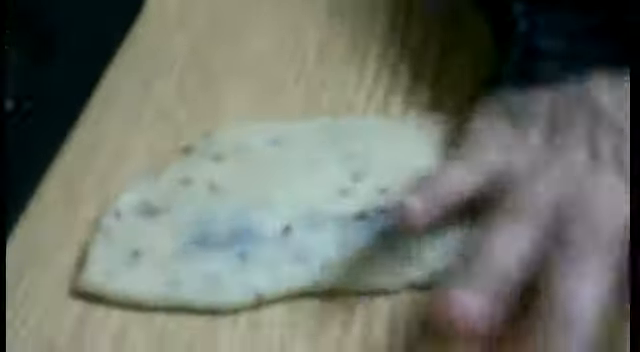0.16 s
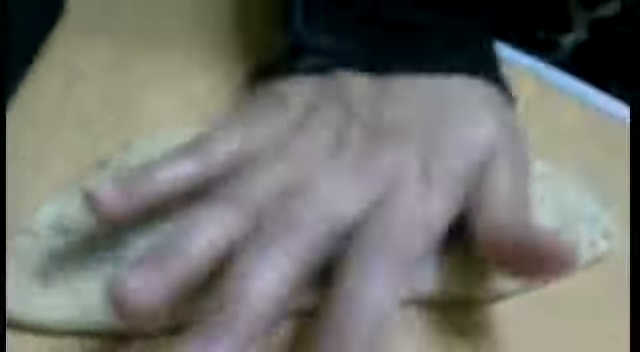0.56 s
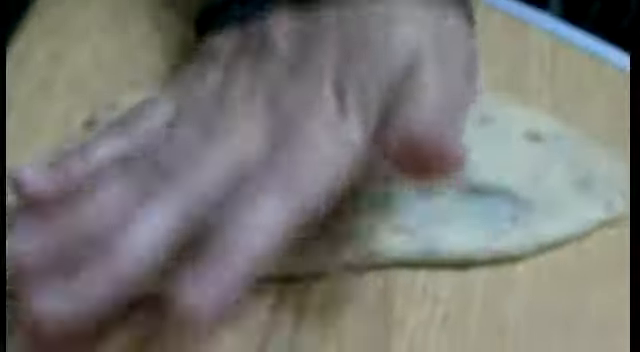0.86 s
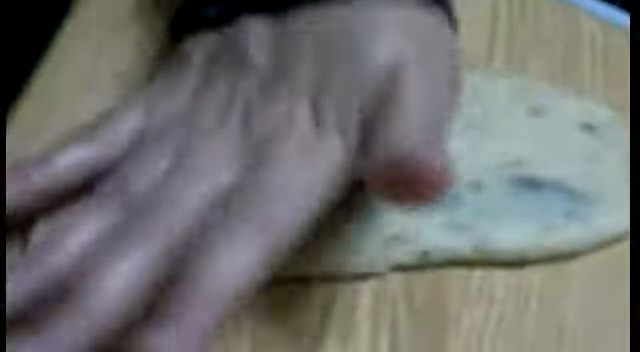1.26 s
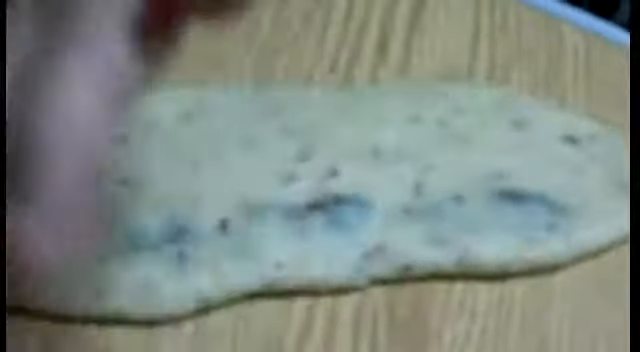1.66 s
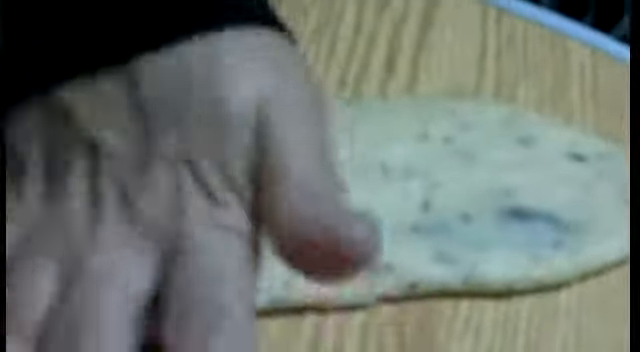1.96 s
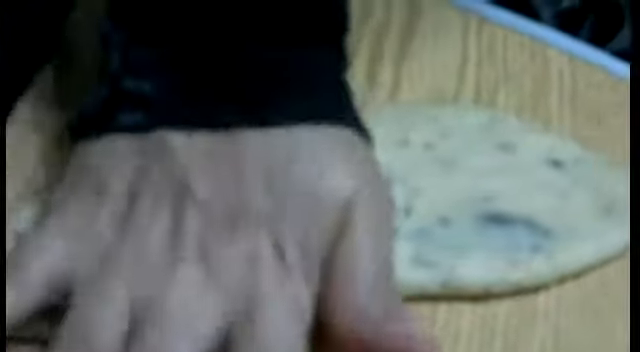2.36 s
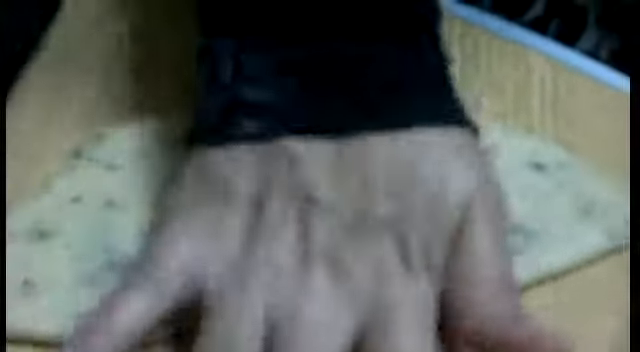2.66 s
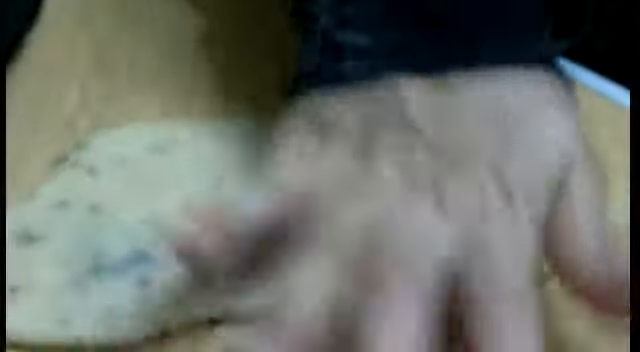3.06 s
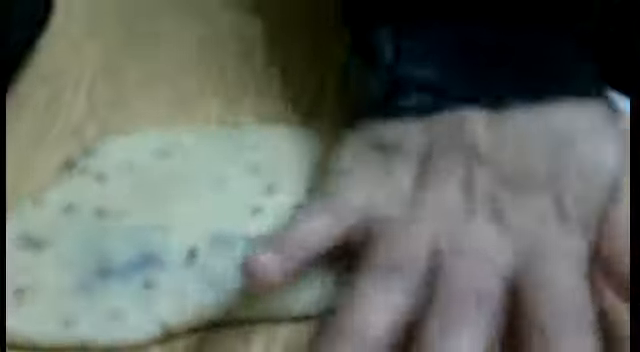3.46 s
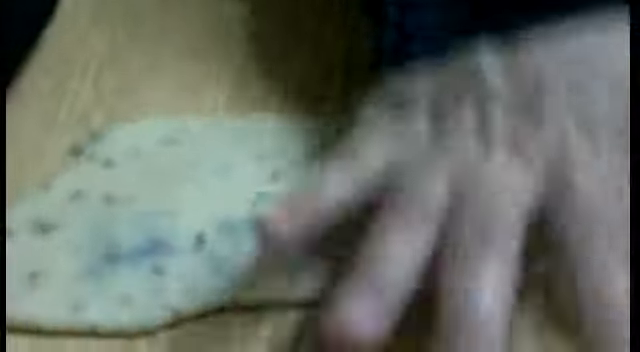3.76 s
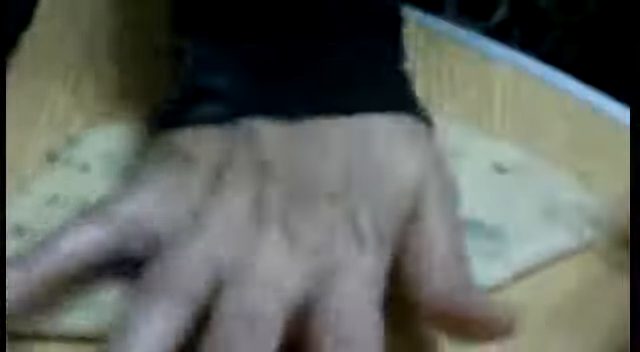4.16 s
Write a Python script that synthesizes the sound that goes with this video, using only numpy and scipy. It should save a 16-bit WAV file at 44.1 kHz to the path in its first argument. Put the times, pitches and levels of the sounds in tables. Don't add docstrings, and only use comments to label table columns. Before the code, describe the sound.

A hand slaps and presses dough on a wooden board. Hard clustered pats come in the first second, gentler dull thumps follow until about two and a half seconds, then a hard flurry and steady firm pats. Skin peels away with short sticky crackles, and loose cutlery briefly chatters after the hardest hits. The kitchen is quiet; the phone lies on the same worktop, so sound is close, woody and mostly on the right.

```python
import sys
import numpy as np
from scipy import signal
from scipy.fft import rfft, irfft
from scipy.io import wavfile
from scipy.ndimage import uniform_filter1d

SR = 44100
rng = np.random.default_rng(int(sys.argv[2]) if len(sys.argv) > 2 else 0)


def unload_wav(signal):
    wavfile.write(
        sys.argv[1],
        SR,
        np.round(np.clip(np.atleast_2d(signal).T, -1, 1) * 32767).astype(np.int16),
    )


def linear_from_db(decibels):
    return 10 ** (np.asarray(decibels, float) / 20)


N = 189559


def read(table, hz):
    f, v = np.transpose(table)
    return np.interp(np.log(np.maximum(hz, 1)), np.log(np.maximum(f, 1)), v)


def colour(x, table):
    return irfft(rfft(x) * linear_from_db(read(table, np.fft.rfftfreq(N, 1 / SR))), N)


def unit(x):
    return x / np.sqrt(np.mean(x ** 2))


def ring(x, hz, t60):
    pole = np.exp(2j * np.pi * hz / SR - np.log(1000) / (t60 * SR))
    return signal.lfilter([1], [1, -pole], x).imag


def band(x, hz, width):
    b, a = signal.iirpeak(hz, hz / width, SR)
    return signal.lfilter(b, a, signal.lfilter(b, a, x))


def crackle(per_s, spread_db):
    hit = rng.random(N) < per_s / SR
    size = linear_from_db(spread_db * rng.exponential(size=N))
    return unit(hit * rng.standard_normal(N) * size)


def wander(rate):
    k = int(SR / rate)
    smooth = uniform_filter1d(rng.standard_normal(N), k)
    return unit(uniform_filter1d(smooth, k))


def effort(events, rise_db_s, fall_db_s):
    t = np.arange(N) / SR
    levels = []
    for s, hold, db in events:
        before = np.maximum(s - t, 0)
        after = np.maximum(t - s - hold, 0)
        levels.append(db - rise_db_s * before - fall_db_s * after)
    return np.max(levels, axis=0)


def kitchen():
    # frequency in Hz, level in dB per Hz.
    air_spectrum = [(15, -42.5), (25, 1.5), (55, 14.5), (103, -6), (206, -6.5), (450, -11), (700, -8.5),
                    (1200, -16), (2000, -20.5), (4000, -25), (8000, -27.5), (12000, -33.5), (15300, -37.5),
                    (16000, -55.5)]
    air = np.array([unit(colour(rng.standard_normal(N), air_spectrum)) for _ in range(2)])
    port_db = np.array([[-1.5], [5.5]])
    return linear_from_db(-63.5 + port_db) * air


def cutlery():
    # frequency in Hz, width in Hz, level in dB.
    pieces = [(6550, 60, 0.5), (7360, 60, 4.5), (7250, 140, 8.5), (7760, 80, 3), (8300, 60, -7),
              (8730, 32, -6.5), (10150, 46, 4), (10450, 29, 0.5), (10600, 60, 1.5), (11500, 50, 0.5),
              (12000, 89, 5.5), (12400, 60, -1.5), (12900, 45, -2), (13300, 70, -11.5), (14300, 70, -13),
              (14750, 70, -10.5)]
    # start in seconds, hold in seconds, level in dB,
    # frequency in Hz of the piece that shakes most.
    shivers = [(0.199, 0.0046, -66.5, 7240), (0.313, 0.017, -62, 9300), (0.437, 0.0036, -68, 7500),
               (0.455, 0.019, -56.5, 10150), (0.478, .015, -58.5, 14500), (.53, .03, -56, 7250),
               (.535, .015, -62, 8730), (0.536, .025, -56, 10500), (2.596, 0.028, -76, 7250),
               (2.607, .03, -62, 10500), (0.493, .004, -62, 12100), (0.523, .01, -57, 11500),
               (0.533, 0.016, -47.5, 11750), (0.715, 0.0069, -63.5, 7460), (0.788, 0.033, -71, 9600),
               (1.822, .008, -66, 8300), (2.339, 0.008, -61, 7650), (2.575, .004, -66, 9000),
               (2.606, .006, -62, 9000), (2.608, .009, -56.5, 12000), (2.634, 0.0065, -54, 12100),
               (2.822, 0.0046, -72, 7500), (2.862, .003, -58, 8000), (2.866, 0.01, -61, 8700),
               (3.401, 0.014, -67.5, 7700), (3.888, .003, -69, 7200)]
    chatter = crackle(6000, 2)
    out = np.zeros(N)
    for hz, width, db in pieces:
        shakes = []
        for s, hold, top_db, most_hz in shivers:
            shakes.append((s, hold, top_db - 31 * abs(np.log2(hz / most_hz))))
        level_db = effort(shakes, rise_db_s=1198.5, fall_db_s=700.5)
        lie_still_db = np.minimum(level_db + 81, 0)
        gain = linear_from_db(level_db + db - 9.5 + 2.0 * wander(30) + lie_still_db)
        out += gain * unit(band(chatter, hz, width))
    return out


def rub():
    # frequency in Hz, level in dB per Hz.
    slip_spectrum = [(18, -32.5), (30, -18.5), (103, -8.5), (146, -15), (193, 12.5), (298, 0), (469, 2),
                     (2040, -5.5), (4000, -22.5), (5300, -41.5), (6890, -57.5), (11700, -120)]
    # start in seconds, hold in seconds, level in dB.
    squeezes = [(0, 0.022, -27.5), (.2, 0.046, -37), (.37, 0.013, -41), (.46, 0.016, -41.5),
                (.61, 0.0088, -40.5), (.74, 0.17, -46), (1.18, 0.06, -42), (1.31, .06, -55.5),
                (1.5, .02, -58), (1.83, 0.012, -57), (2.07, 0.0085, -39), (2.27, 0.024, -59),
                (2.5, 0.063, -47.5), (2.72, 0.06, -40.5), (2.93, 0.029, -39.5), (3.2, 0.0026, -39),
                (3.42, 0.025, -41.5), (3.66, 0.0078, -34.5), (4, 0.027, -47)]
    level_db = effort(squeezes, rise_db_s=147, fall_db_s=182)
    return linear_from_db(level_db - 2.5) * unit(colour(crackle(7000, 0.8), slip_spectrum))


def peel():
    # frequency in Hz, width in Hz, level in dB.
    hiss_bands = [(3400, 907, 19.5), (4100, 150, 14), (4570, 530, 7.5), (6070, 590, -18.5),
                  (10500, 12000, -49.5)]
    # start in seconds, hold in seconds, level in dB.
    releases = [(0, 0.06, -35.5), (.23, 0.0075, -29), (.26, 0.068, -36.5), (.47, 0.0014, -27),
                (.53, 0.048, -33.5), (.74, 0.07, -36.5), (.98, 0.026, -43), (1.2, 0.015, -62),
                (1.84, 0.0093, -38), (2.08, 0.0095, -41.5), (2.36, 0.0033, -38), (2.55, 0.14, -36),
                (2.82, 0.065, -37), (3.06, 0.028, -40.5), (3.14, 0.013, -42), (3.32, 0.085, -40.5),
                (3.55, 0.029, -40.5), (3.63, 0.012, -44), (3.83, 0.0069, -39.5), (3.9, 0.034, -38.5),
                (4.09, 0.017, -43.5), (4.16, 0.04, -43)]
    level_db = effort(releases, rise_db_s=908, fall_db_s=313)
    slips = crackle(9000, 1.8)
    hiss = sum(linear_from_db(db) * unit(band(slips, hz, width)) for hz, width, db in hiss_bands)
    return linear_from_db(level_db - 4.0) * unit(hiss)


def cracks():
    # start in seconds, level in dB, pitch in Hz.
    tears = [(0.0144, -48, 4200), (0.0343, -52, 4130), (0.2034, -53, 4900), (0.213, -40, 4540),
             (0.2259, -49, 4300), (0.2818, -32, 4150), (0.4334, -47, 4650), (0.4377, -36, 4240),
             (0.4542, -28, 4230), (0.4683, -23, 4270), (0.4683, -39, 4460), (0.515, -24, 4330),
             (0.7, -42, 4240), (0.7225, -35, 4220), (0.7426, -31, 4100), (1.823, -39.5, 4400),
             (1.847, -53, 4200), (2.0747, -59, 4330), (2.3356, -52.5, 4360), (2.5187, -34.5, 4220),
             (2.5321, -34, 4200), (2.5497, -33, 4200), (2.5726, -41, 4280), (2.583, -30, 4170),
             (2.6, -31.5, 4570), (2.6324, -29.5, 4300), (2.6798, -54, 4450), (2.7661, -51, 5300),
             (2.7826, -44, 4260), (2.8002, -31, 4040), (2.835, -50, 4240), (2.855, -39, 4540),
             (3.0397, -38.5, 4700), (3.054, -49, 4290), (3.0734, -58, 4340), (3.1193, -58, 4750),
             (3.1423, -45, 4170), (3.2931, -38, 4770), (3.3094, -44, 4440), (3.359, -50, 4200),
             (3.369, -52, 4140), (3.5498, -56, 4610), (3.6112, -59, 4720), (3.6316, -38, 4220),
             (3.8062, -38, 4510), (3.8237, -58, 4230), (3.8871, -55, 4600), (3.8891, -54, 4260),
             (4.0632, -63, 4410), (4.156, -46, 4420)]
    # start in seconds, level in dB, pitch in Hz.
    air_ticks = [(0.016, -65, 8500), (0.206, -51, 9000), (.706, -58, 9040), (.953, -70.5, 8000),
                 (1.831, -53, 8500), (2.241, -55, 10000), (2.5187, -49.5, 9500), (2.533, -68, 12500),
                 (2.689, -55, 10000), (2.854, -53, 8500), (3.041, -59.5, 9500), (3.057, -68, 13000),
                 (3.121, -71, 12500), (3.2928, -55, 9000), (3.372, -59, 12400), (3.5345, -52.5, 9200),
                 (3.806, -54.5, 9900), (3.889, -68, 9100)]
    rows = [*tears, *air_ticks]
    out = np.zeros(N)
    t = np.arange(600) / SR
    for s, db, hz in rows:
        burst = unit(band(rng.standard_normal(len(t)), hz, hz * 0.37))
        out[int(s * SR):][:len(t)] += linear_from_db(db - 6.5) * burst * np.exp(-t / 0.0037)
    return out


def taps():
    # start in seconds, level in dB, pitch in Hz.
    drops = [
        (.4685, -11, 2200),
        (2.5495, -6, 2000),
        (3.3285, -17, 1750),
        (3.5665, -16, 1750),
    ]
    out = np.zeros(N)
    t = np.arange(300) / SR
    for s, db, hz in drops:
        tick = np.sin(2 * np.pi * hz * t) * np.exp(-t / 0.0007)
        out[int(s * SR):][:len(t)] += linear_from_db(db + 5) * tick
    return out


def contacts():
    # start in seconds, snap in dB, thud in dB, knock in dB.
    heels = [(0.033, -40.5, -25.5, -25.5), (0.216, -8.5, -16, -17), (0.2822, -11, -19, -17),
             (0.467, -13, -18.5, -48.5), (0.7017, -11, -25.5, -20), (0.77, -19, -19, -27),
             (1.007, -26.5, -26, -27), (1.211, -27, -22, -28), (1.426, -25, -24.5, -32.5),
             (1.749, -32, -26.5, -31.5), (1.8221, -29.5, -29, -46), (1.8501, -25.5, -33, -27),
             (2.0716, -20, -25.5, -27), (2.087, -32.5, -34, -42), (2.7838, -11.5, -33.5, -19),
             (2.8489, -13, -20, -17.5), (3.0566, -10, -16.5, -20), (3.1207, -12.5, -20, -16.5),
             (3.3109, -11, -15.5, -23.5), (3.551, -13, -23.5, -19), (3.612, -12, -18, -15.5),
             (3.8244, -20.5, -19.5, -24), (3.8883, -10.5, -18.5, -18), (4.063, -30, -27, -23),
             (4.0785, -20.5, -23.5, -31.5), (4.18, -25, -27.5, -28.5), (0.4548, -9.5, -37, -15.5),
             (0.5145, -9.5, -18, -21.5), (2.5342, -6.5, -14.5, -20.5), (3.3725, -12, -38, -19.5)]
    # start in seconds, snap, thud and knock in dB, snap pitch in Hz.
    slaps = [(0.0154, -8.5, -19.5, -23, 2960), (0.7425, -8, -23.5, -27, 3000),
             (0.97, -25, -27.5, -34.5, 2120), (2.252, -28, -44.5, -33, 2370),
             (2.3374, -21.5, -22.5, -22.5, 1690), (2.584, -12.5, -19.5, -31.5, 2820),
             (2.5953, -13, -33.5, -25.5, 1340), (2.6015, -10.5, -37, -31, 3300),
             (2.6485, -26.5, -39, -37.5, 1470), (3.8625, -28, -44, -38, 1500), (.4385, -23, -41, -28, 1900),
             (.557, -25, -39.5, -40.5, 2030), (3.359, -20.5, -22, -51, 2240), (.184, -44, -47, -33.5, 2660),
             (1.1785, -22.5, -45, -38, 2590), (2.089, -30, -45, -45.5, 3300),
             (1.44, -34, -26.5, -28.5, 700), (0.7451, -13.5, -40.5, -41, 3200),
             (.2395, -14, -41, -44, 3300), (.7055, -17, -29.5, -23, 800), (4.0695, -31, -31, -28, 562),
             (.2225, -8.5, -33, -48, 2150), (.4718, -16, -34.5, -33.5, 2689),
             (0.503, -23.5, -41, -29, 2400), (0.805, -40.5, -33.5, -36, 3300), (2.536, -15, -26, -13, 1440),
             (2.5985, -13, -34.5, -27, 3320), (2.634, -21.5, -48, -46.5, 3930),
             (2.854, -14.5, -36, -33, 3240), (3.8288, -17.5, -29, -27, 815), (3.902, -29, -31, -45, 2400),
             (4.2978, -34.5, -30, -37.5, 1500)]
    # start in seconds, snap in dB, thud in dB.
    tips = [(.078, -20, -43.5), (0.0955, -21.5, -50), (0.2018, -24.5, -45), (0.2055, -15.5, -41),
            (0.2383, -11, -20), (.7219, -6, -24), (0.953, -19, -43), (1.018, -24, -44), (1.165, -16.5, -42),
            (1.7813, -20, -29.5), (1.7915, -26, -32.5), (1.8535, -22, -35), (2.023, -19, -28),
            (2.265, -30, -27.5), (2.3486, -17.5, -40), (2.3515, -18.5, -40), (2.5192, -12.5, -41.5),
            (2.545, -23.5, -32.5), (2.681, -12.5, -28), (2.801, -6.5, -21), (2.836, -15, -24),
            (3.0736, -7.5, -43.5), (3.2922, -21, -31), (3.564, -40, -22.5), (3.8443, -8, -32.5),
            (3.8774, -21.5, -26.5), (4.143, -32, -40)]
    # start in seconds, snap in dB, thud in dB.
    touches = [(0.15, -32, -51), (.438, -30, -26), (0.5, -30, -40.5), (0.678, -39.5, -37),
               (0.932, -39.5, -40), (0.992, -29, -41.5), (1.1169, -44, -32.5), (1.114, -32, -30.5),
               (1.231, -36.5, -30), (1.195, -38.5, -46), (1.377, -41, -35), (1.404, -34.5, -26),
               (1.7335, -45.5, -43), (1.746, -40.5, -40.5), (1.831, -33, -39), (0.7, -36, -45.5),
               (0.72, -28, -27.5), (.448, -25, -38), (2.49, -33, -47.5), (3.3045, -23, -32.5),
               (1.9785, -42, -42), (1.9897, -38.5, -40.5), (2.2387, -36.5, -61.5), (2.2836, -28, -55),
               (2.318, -42, -44.5), (2.324, -29, -45.5), (3.821, -26, -32), (2.7674, -27.5, -28),
               (3.04, -25.5, -21), (3.34, -26.5, -45), (3.5345, -29, -28), (3.528, -42, -45),
               (3.297, -30, -40), (1.398, -34, -30), (2.3, -42.5, -50), (3.807, -32.5, -43.5),
               (4.055, -42, -39), (4.16, -30, -50.5), (4.288, -51.5, -38)]
    # start in seconds, knock in dB, snap in dB.
    settles = [(0.308, -47.5, -38.5), (0.803, -29.5, -26.5), (1.301, -37, -76), (1.341, -36, -58),
               (1.441, -33, -59), (1.497, -38.5, -53), (2.143, -58, -47), (2.451, -51.5, -44.5),
               (2.648, -36, -24), (2.705, -37, -35), (2.894, -27.5, -28.5), (2.955, -69, -42),
               (3.013, -39, -59), (3.15, -45, -27), (3.446, -57.5, -31.5), (3.655, -52.5, -34),
               (3.739, -45, -78), (3.928, -25, -26.5)]
    rows = []
    for s, snap, thud, knock in heels:
        rows.append((s, snap, thud, knock, 1455, -2, -42))
        rows.append((s + 0.003743, snap, thud - 9, knock - 9, 926, -9, -42))
    for s, snap, thud, knock, hz in slaps:
        rows.append((s, snap, thud, knock, hz, -5, -31.5))
    for s, snap, thud in tips:
        rows.append((s, snap, thud, snap - 17, 1808, -11, -35.5))
    for s, snap, thud in touches:
        rows.append((s, snap, thud, snap - 2.5, 1240, 3, -14))
    for s, knock, snap in settles:
        rows.append((s, snap, knock - 2, knock, 1100, 1, -35.5))
    return rows


def board():
    # frequency in Hz, level in dB, t60 in seconds.
    modes = [(35.4, -9, 0.15), (60.3, -13.5, 0.083), (101.1, -3, 0.3), (206.3, 1, 0.36), (262, -29, 0.11),
             (327, -10, 0.018), (388, -29.5, 0.032), (476, -4, 0.098), (526, -0.5, 0.058),
             (614.4, 0.5, 0.034), (687, -7, 0.054), (804, 4.5, 0.012), (960, -7.5, 0.071),
             (1041, -2.5, 0.052), (1229, -0.5, 0.047), (1337, -12.5, 0.088), (1734, 3, 0.025),
             (1900, -4, 0.016), (2013, 2, 0.023), (2820, 4.5, 0.013), (2630, -23.5, 0.019),
             (3300, -1.5, 0.028), (3740, -23.5, 0.03)]
    # frequency in Hz, level in dB, t60 in seconds.
    tail = [(97.5, -0.5, 0.22), (212, -0.5, 0.26), (349, -12, 0.27), (550, -5, 0.24), (1055, -15.5, 0.23),
            (1420, -15, 0.22), (2350, -13, 0.14), (3540, -33.5, 0.053), (4150, -47, 0.22),
            (6520, -40.5, 0.057)]
    s, snap_db, thud_db, knock_db, snap_hz, ring_db, click_db = np.transpose(contacts())
    start = np.minimum((s * SR).astype(int), N - 1)
    t = np.arange(1024) / SR
    place = np.minimum(start[:, None] + np.arange(len(t)), N - 1).ravel()
    spot = rng.standard_normal((len(s), len(modes)))

    ragged = rng.standard_normal((len(s), len(t)))
    soft = np.clip((-16.5 - snap_db[:, None]) / 14, 0, 1)
    spread_s = 0.0029 * soft
    blow = ragged * np.exp(-t / (0.0026 + spread_s)) * (1 - np.exp(-t / (0.0003 + spread_s)))
    blow[:, :9] += 0.88 * (1 - soft) * np.hanning(9)
    blow /= np.sqrt(np.sum(blow ** 2, axis=1, keepdims=True))

    def strength(hz):
        octaves_up = np.clip(np.log2(hz / 2400), 0, 1.5)
        hardness = linear_from_db(0.5 * np.minimum(snap_db - 9.5, 0) * octaves_up)
        if hz < 300:
            return linear_from_db(thud_db) * hardness
        if hz < 800:
            return linear_from_db(knock_db) * hardness
        return linear_from_db(snap_db + ring_db + 2 - 4 * abs(np.log2(hz / snap_hz))) * hardness

    out = np.zeros(N)
    for k, (hz, db, t60) in enumerate(modes):
        if hz < 300:
            push = np.exp(-t * hz / 0.5) * t * hz * hz / SR * 12
            force = push[None] * np.sign(spot[:, k, None] + 0.8)
        else:
            force = blow
        trim_db = 1.5 if hz < 800 else 9
        gain = strength(hz) * linear_from_db(db - trim_db + 1.84 * spot[:, k])
        drive = np.bincount(place, (force * gain[:, None]).ravel(), N)
        out += ring(drive, hz, t60)

    for hz, db, t60 in tail:
        fall = np.exp(-2 * np.log(1000) / (t60 * SR))
        power = np.bincount(start, strength(hz) ** 2, N)
        power = signal.lfilter([1], [1, -fall], power)
        power = signal.lfilter([0.005], [1, -0.995], power)
        noise = unit(band(rng.standard_normal(N), hz, hz * 0.54))
        out += linear_from_db(db - 4.5) * np.sqrt(power) * noise

    phase = 2 * np.pi * snap_hz[:, None] * t
    snap = np.sin(phase) + linear_from_db(-9) * np.sin(1.706 * phase)
    snap *= np.exp(-t / 0.0008) * (1 - np.exp(-t / 0.0002)) ** 2
    snap *= linear_from_db(snap_db + 5.5)[:, None]
    snap[:, :3] += linear_from_db(snap_db + click_db)[:, None] * ragged[:, :3]
    return out + np.bincount(place, snap.ravel(), N)


def squelch(x):
    # frequency in Hz, level in dB.
    threshold = [(300, -61), (2500, -71.5), (3000, -56.5), (4500, -60.5), (6000, -76.5), (14000, -104.5)]
    hz, _, z = signal.stft(x, SR, nperseg=512, noverlap=384)
    power = uniform_filter1d(np.abs(z) ** 2, size=7, axis=0)
    power = uniform_filter1d(power, size=5, axis=1)
    over = (power / linear_from_db(read(threshold, hz))[:, None] ** 2) ** 2
    gain = (over + 0.2) / (1 + over)
    return signal.istft(z * gain, SR, nperseg=512, noverlap=384)[1][:N]


def thin_treble(x):
    # frequency in Hz, level in dB against the whole sound.
    treble_limit = [(4000, -100), (5500, -79.5), (7000, -66.5), (9500, -68.5), (12000, -82), (15500, -67.5)]
    hz, _, z = signal.stft(x, SR, nperseg=1024, noverlap=512)
    power = np.abs(z) ** 2
    group = power[:, :512].reshape(2, 32, 16, -1).mean(axis=2)
    scatter = linear_from_db(15.5 * rng.standard_normal(group.shape[1:])) ** 2
    group = np.repeat(group * scatter, 16, axis=1)
    whole = power.sum(axis=1, keepdims=True)
    limit = whole * linear_from_db(read(treble_limit, hz[:512]))[:, None] ** 2 + 1e-18
    over = (group / limit) ** 4
    z[:, :512] *= (over + 0.1) / (1 + over)
    return signal.istft(z, SR, nperseg=1024, noverlap=512)[1][:, :N]


def scene():
    # frequency in Hz, level in dB.
    wood_path = [(4, -49), (20, -6), (40, -6.5), (2500, 1), (3500, -3.5), (4500, -3), (5500, -31.5),
                 (7000, -43.5), (12000, -18.5), (16000, -33)]
    # frequency in Hz, level in dB.
    port_db = [(40, -12), (130, -13.5), (260, -17.5), (500, -23), (1000, -19.5), (1380, -27), (2000, -15.5),
               (2700, -31), (4500, -24), (9000, -27.5), (11500, -47.5)]
    # frequency in Hz, lead in radians.
    port_lead = [(0, -1.4), (130, -1.4), (260, -.9), (500, -.25), (750, .25), (1380, .3), (1600, 2.6),
                 (2000, 3.1), (2700, 3.1), (3100, 5), (5000, 7), (22050, 31)]
    # frequency in Hz, level in dB.
    loose_path = [(60, -36), (400, -24.5), (1000, -34), (1700, -22.5), (3000, -28.5), (5500, -11),
                  (9500, -5), (11500, -32)]
    # time in seconds, level in dB.
    left_open = [(0, -1), (.3, 1.5), (.6, 0.5), (.9, -1.5), (1.45, -1.5), (1.78, -3), (2.1, -3.5),
                 (2.4, -1.5), (2.52, 6), (2.57, 2.5), (2.66, -1), (3.1, 1.5), (3.6, -1), (4.0, -0.5),
                 (4.3, -2.5)]
    give = 0.78
    knocks = np.tanh(give * (board() + taps())) / give
    at_port = colour(knocks, wood_path) + rub() + peel() + cutlery() + cracks()
    right = linear_from_db(2.5) * squelch(at_port)
    right[-3:] -= linear_from_db(-30.5)
    hz = np.fft.rfftfreq(N, 1 / SR)
    lead = np.exp(1j * np.interp(hz, *np.transpose(port_lead)))
    copy = irfft(rfft(right) * linear_from_db(read(port_db, hz)) * lead, N)
    own = colour(right * wander(430), loose_path)
    shade = linear_from_db(np.interp(np.arange(N) / SR, *np.transpose(left_open)))
    return np.array([(copy + own) * shade, right]) + kitchen()


def top_cut(x):
    return signal.sosfilt(signal.butter(12, 15650, fs=SR, output="sos"), x)


def record(dry):
    mix = thin_treble(dry)
    return top_cut(mix)


dry = scene()
out = record(dry)
unload_wav(out)
```